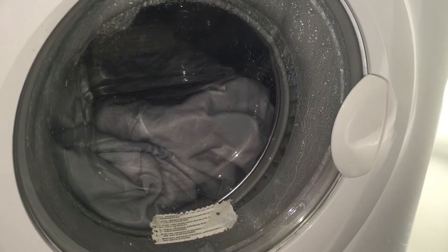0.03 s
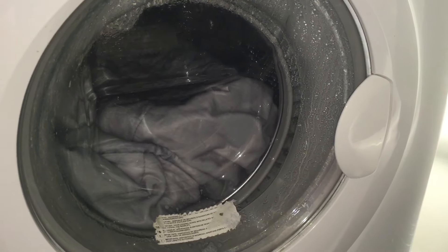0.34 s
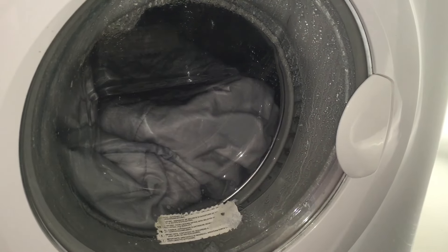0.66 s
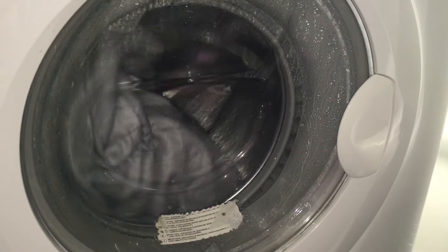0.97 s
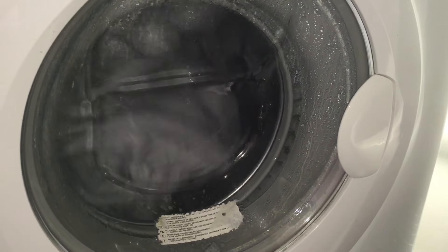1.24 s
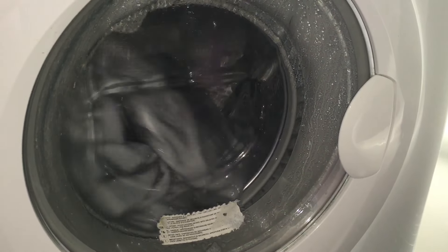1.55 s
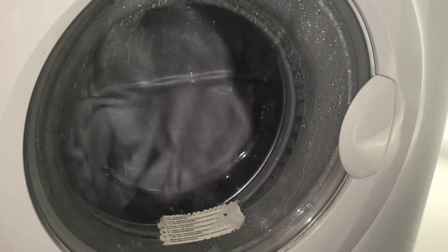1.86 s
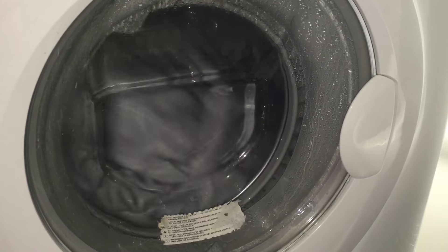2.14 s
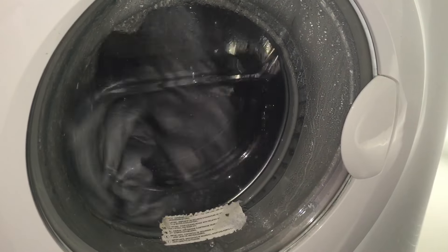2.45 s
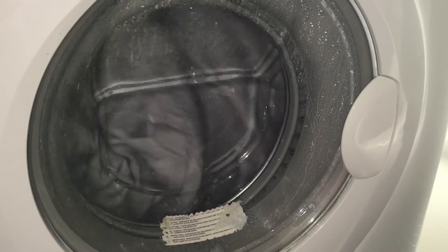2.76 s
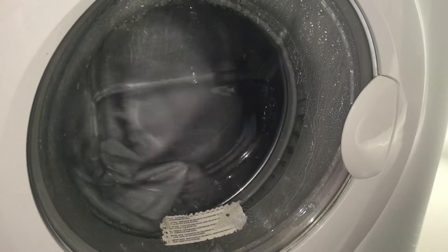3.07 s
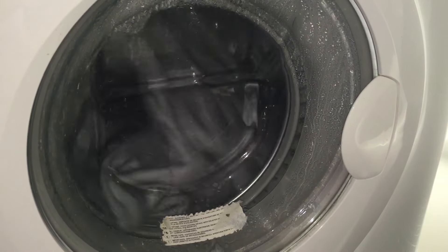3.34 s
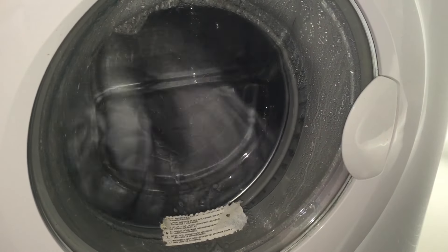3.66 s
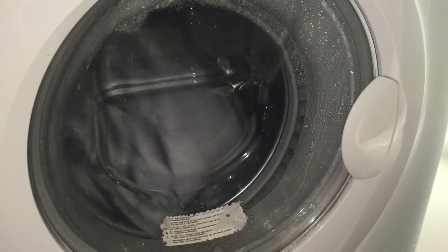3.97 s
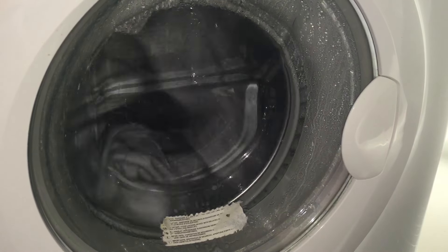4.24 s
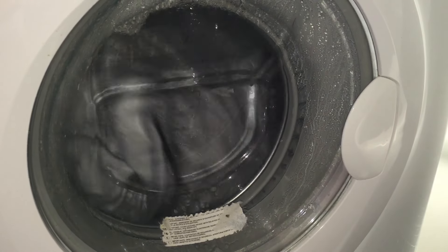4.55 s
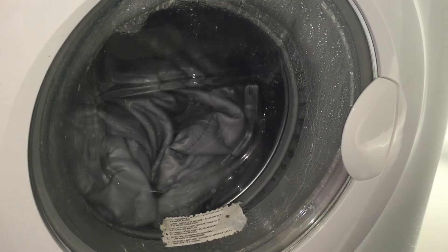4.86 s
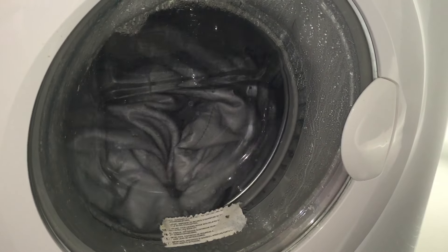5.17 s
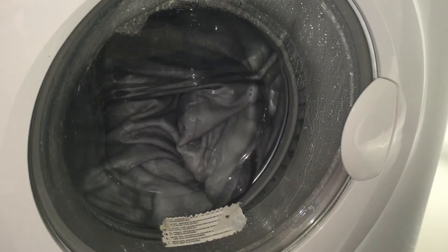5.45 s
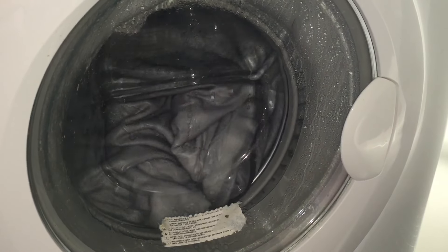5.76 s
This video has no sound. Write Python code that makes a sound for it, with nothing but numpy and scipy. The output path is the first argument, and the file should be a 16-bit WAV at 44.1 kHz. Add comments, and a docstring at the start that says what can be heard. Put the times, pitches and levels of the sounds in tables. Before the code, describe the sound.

A washing machine clicks on, hums and tumbles wet laundry with sloshes, slaps and thuds for about four seconds, then stops.

```python
"""In a small hard room, a front-loading washing machine makes one four-second tumble.
A relay (an electric switch) clacks, and the mains motor hums with a slow throb. Wet laundry
falls in the steel drum: it sloshes, slaps, and thuds against a tub that hangs on springs.
The motor cuts out, the load settles with a last flop, and a faint idle hum remains."""
import sys
import numpy as np
from scipy import signal
from scipy.fft import rfft, irfft, next_fast_len
from scipy.io import wavfile
from scipy.ndimage import uniform_filter1d, map_coordinates

SR = 44100
rng = np.random.default_rng(int(sys.argv[2]) if len(sys.argv) > 2 else 0)


def inscribe(sig):
    """Save sig as 16-bit PCM at rate SR to the path in sys.argv[1].

    A 1-D sig is mono; a 2-D sig holds one channel per row.
    Samples are clipped to [-1, 1] before scaling.
    """
    pcm = np.round(np.clip(np.atleast_2d(sig).T, -1, 1) * 32767)
    wavfile.write(sys.argv[1], SR, pcm.astype(np.int16))


N = 264908

# how long the room takes to fade by 60 dB: (frequency [Hz], fade time [s])
ROOM_FADE = [(100, 0.46), (1000, 0.5), (3500, 0.41), (9000, 0.3), (15000, 0.17)]
# the hum of the waiting machine: (frequency [Hz], level [dB])
IDLE_TONES = [(123.8, -75.5), (200, -79.5), (300.1, -71.5)]
# the motor's magnetic hum; two weaker side tones around each tone make it throb:
# (multiple of the mains [ratio], level [dB], upper side tone [ratio], lower side tone [ratio])
MOTOR_TONES = [(2, -60.5, 0.14, 0.1), (4, -48.5, 0.03, 0.022), (6, -46, 0.64, 0.49), (10, -54, 0.03, 0.052)]

# the tone colour of each noise: (frequency [Hz], relative level [dB])
AIR_COLOUR = [(15, -55), (25, -28), (64, -6.5), (129, -10), (152, -13.5), (189, -11), (268, -15), (299, -6),
              (324, -18), (413, -18.5), (485, -21.5), (951, -18.5), (1030, -23.5), (1590, -23),
              (15700, -37)]  # room air
CLACK_COLOUR = [(200, -3), (600, -0.5), (1200, -4), (1950, 1), (2600, -5), (3900, -5.5), (4400, -23.5),
                (5400, -16), (6800, -16), (7900, -28), (9200, -21), (15500, -27)]  # relay contacts
TICK_COLOUR = [(1200, 1), (2200, -3.5), (3400, 8), (4500, -5), (6000, 1.5), (7800, -12), (9000, -13),
               (13000, -13), (16000, -16)]  # small hard hits
CHURN_COLOUR = [(290, -34), (350, 0.5), (400, -1.5), (445, -13.5), (485, -5), (530, 1.5), (600, -4),
                (720, -1.5), (900, -2.5), (1400, -11), (2000, -26), (3000, -55)]  # water at the bottom of the tub
SLOSH_COLOUR = [(300, -46), (380, -5), (445, -13), (540, -4.5), (700, 0), (900, -7), (1080, 1), (1320, -3),
                (1600, -14), (1900, -3.5), (2500, -82), (5000, -61)]  # water moved by a fall
SPRAY_COLOUR = [(1000, -30), (1600, -1), (1950, -0.5), (2400, -6.5), (2900, -12.5), (3400, -11),
                (4100, -15.5), (4800, -22.5), (5700, -15), (7500, -24), (9000, -18.5), (15500, -52)]  # drops on the door glass
SLAP_COLOUR = [(150, -3.5), (350, 7.5), (450, 1.5), (600, -2.5), (1000, -4.5), (1400, -2.5), (2000, -9),
               (2800, -33), (5000, -41)]  # wet cloth landing
SPLASH_COLOUR = [(1200, -17), (2100, 6), (2900, -4), (3500, -3), (4100, -10), (4700, -18), (5800, -16.5),
                 (8000, -35), (15000, -50)]  # the splash of that landing

# the notes at which each part rings: (frequency [Hz], width [Hz], relative level [dB])
TUB_NOTES = [(41.8, 4.9, -15), (59, 7.5, -1), (74, 8.8, 1), (109.3, 5.4, -3), (125.5, 4.8, -2)]  # the tub on its springs
CABINET_NOTES = [(172.2, 7.3, 4), (195.3, 8.9, -1.5), (226, 12, -6), (269.7, 20, -6.5), (304.7, 14.4, -3.5),
                 (376, 13, -15.5)]  # the outer panels
DRUM_NOTES = [(828, 25, -3), (960, 54, -4), (1288, 74, 1), (1484, 27, -2.5)]  # the steel drum
# the notes of the relay's case: (frequency [Hz], relative level [dB], time to fade 60 dB [s])
CASE_NOTES = [(1500, -7.5, 0.29), (1730, -1.5, 0.15), (1943, 6.5, 0.035), (2184, -12, 0.1),
              (2510, -8, 0.18), (2630, -3, 0.07), (3320, -12, 0.13), (5265, -12, 0.12), (5670, -22, 0.18)]

# a faint relay picks the direction, the main one closes and bounces: (time [s], relative level [dB])
RELAY_HITS = [(0.472, -63.5), (0.7956, -37.5), (0.801, -36.5), (0.812, -41.5)]
# drops and fasteners tick in the drum: (time [s], relative level [dB])
TICK_HITS = [(0.4706, -70), (1.036, -45.5), (1.1503, -54), (1.292, -47.5), (1.378, -50), (1.5798, -56),
             (1.9517, -52), (2.2975, -50.5), (2.552, -53), (2.652, -51), (3.073, -50.5), (3.6703, -54),
             (4.073, -51), (4.422, -47), (4.928, -57)]
# short ringing notes: air pockets glug, and the steel drum rings once near 1300 Hz:
# (time [s], pitch [Hz], level [dB])
SHORT_RINGS = [(1.372, 2090, -48), (1.855, 1960, -42), (2.122, 1914, -42), (2.548, 2040, -47),
               (2.771, 1310, -39), (3.276, 2440, -50), (3.7, 864, -38), (3.854, 1650, -44),
               (4.252, 1070, -38), (4.474, 1810, -42.5)]
# folds of wet laundry fall and slide down the drum:
# (time [s], slide length [s], slosh [dB], spray [dB], drag on the steel [dB], tub rumble [dB])
LAUNDRY_FALLS = [(0.83, 0.25, -55.5, -57, -63, -55), (1.135, 0.072, -55, -57, -63, -51),
                 (1.37, 0.22, -52, -54.5, -56.5, -45), (1.62, 0.16, -58, -59, -65, -46.5),
                 (1.795, 0.14, -53, -58, -59, -53.5), (2.07, 0.12, -53.5, -58.5, -64, -39.5),
                 (2.24, 0.047, -56.5, -61.5, -62, -44), (2.55, 0.17, -54, -64, -62, -50.5),
                 (2.738, 0.033, -55, -57, -50, -76), (2.86, 0.084, -53, -60.5, -76, -49),
                 (3.17, 0.19, -56.5, -57.5, -68, -49), (3.41, 0.25, -58.5, -63, -66.5, -50),
                 (3.648, 0.095, -51, -60.5, -68, -54), (3.86, 0.12, -54, -60.5, -57, -42.5),
                 (4.015, 0.047, -53, -60.5, -69, -52), (4.25, 0.3, -59.5, -60, -59.5, -46.5),
                 (4.553, 0.018, -55, -65, -48, -63), (4.718, 0.026, -53.5, -78, -52, -42),
                 (4.93, 0.043, -60.5, -69, -65, -54)]
# the load or the drive jolts the drum: (time [s], tub level [dB], cabinet level [dB])
JOLTS = [(0.46, -52, -58), (0.817, -40.5, -43), (0.863, -49, -31), (0.98, -41, -31), (1.025, -33, -27),
         (1.369, -42, -33), (1.529, -32.5, -35), (2.063, -34, -52), (2.134, -46, -31.5), (2.358, -37, -52),
         (2.469, -36, -55), (2.93, -35.5, -34), (3.01, -41, -46), (3.161, -35.5, -56), (3.521, -53, -31.5),
         (3.684, -37, -39), (3.864, -29.5, -44), (3.921, -33, -35), (4.33, -40.5, -36), (4.399, -52, -30),
         (4.555, -38, -35.5), (4.728, -39, -35), (5.17, -60, -55.5)]
# wet cloth slaps the drum and the door glass:
# (time [s], relative level [dB], splash offset [dB], centre of the smack's tone [Hz])
CLOTH_HITS = [(0.991, -36.5, -19, 853), (1.143, -39.5, -12, 1940), (1.376, -31.5, -7.5, 1310),
              (1.498, -31, -20, 600), (1.795, -35, -19, 1710), (1.92, -38, -35, 855),
              (2.094, -39.5, -35, 1170), (2.153, -40, -17, 1700), (2.242, -39.5, -10, 1500),
              (2.551, -36, -15.5, 1630), (2.589, -35.5, -30, 776), (2.752, -37, -15, 1190),
              (2.775, -33, -23, 1320), (2.819, -39, -30, 974), (2.904, -34.5, -24, 810),
              (2.952, -40, -29, 1450), (3.169, -35.5, -29, 1510), (3.648, -35.5, -21, 842),
              (3.691, -34, -33, 859), (3.856, -33.5, -17.5, 1500), (3.879, -46, -27, 1270),
              (4.024, -36, -16.5, 786.4), (4.254, -40, -13, 1070), (4.396, -37, -29, 799),
              (4.555, -34.5, -22, 1460), (4.579, -38, -23, 1300), (4.715, -38, -37, 1250),
              (4.931, -40.5, -14, 799)]

START_S, CUT_S, REST_S = 0.797, 4.46, 4.78  # motor on, motor off, load starts to settle
MAINS_HZ, TOP_HZ = 50.02, 15780
THROB_HZ, THROB_CREST_S = 5.65, 3.182  # the throb's rate and the time of one crest
THROB_START_SHARE, THROB_BUILD_S = 0.27, 2  # its depth at the start, time to full depth
SOFT_START_DB, RUN_UP_S, MOTOR_FADE_DB_PER_S = -21, 0.3, 135
ROLL_UP_S, SETTLE_DB_PER_S = 0.084, 114
# steady levels while the drum turns
ROLL_TUB_DB, ROLL_CABINET_DB = -50.5, -48.5
ROLL_CHURN_DB, ROLL_SPRAY_DB, ROLL_DRAG_DB = -55, -63.5, -64.5
FALL_ATTACK_S, SLIDE_SAG_DB_PER_S = 0.014, 7.5
WATER_DRAIN_DB_PER_S, DRAG_FADE_DB_PER_S, TUB_FADE_DB_PER_S = 103, 113, 77
FALL_BOOM_DB, FALL_CHURN_DB = 6, 0.5  # compared with the same fall's slosh


def amp(db):
    """Turn decibels into a gain, the number to multiply a sound by."""
    return 10 ** (np.asarray(db) / 20)


def unit(x):
    """Scale x to an average (rms) level of 1."""
    return x / np.sqrt(np.mean(x ** 2) + 1e-20)


def along(points, hz):
    """Read between (frequency, value) points, with octaves evenly spaced."""
    point_hz, values = np.transpose(points)
    return np.interp(np.log(hz + 1), np.log(point_hz + 1), values)


def wobble(rate):
    """A smooth random curve through rate points a second."""
    points = rng.standard_normal(int(N * rate / SR) + 4)
    return map_coordinates(points, [np.arange(N) * rate / SR])


def filtered(x, response):
    """Scale each frequency in x by response(frequency)."""
    size = next_fast_len(len(x) + SR // 4)
    return irfft(rfft(x, size) * response(np.fft.rfftfreq(size, 1 / SR)), size)[:len(x)]


def coloured(x, colour):
    """Give x a tone colour and an average level of 1."""
    return unit(filtered(x, lambda hz: amp(along(colour, hz))))


def resonate(x, notes):
    """Let x shake a body, which rings at its own notes and gives off little far from them."""
    def body(hz):
        return sum((-1) ** k * amp(db) * 1j * hz * width / (note ** 2 - hz ** 2 + 1j * hz * width)
                   for k, (note, width, db) in enumerate(notes))
    band = signal.butter(3, [notes[0][0], 1.41 * notes[-1][0]], "band", fs=SR, output="sos")
    return signal.sosfilt(band, filtered(x, body))


def steady(x, span_s):
    """Even out the level of x over span_s seconds."""
    return x / np.sqrt(np.abs(uniform_filter1d(x ** 2, int(span_s * SR))) + 1e-12)


def add(track, s, sound):
    """Mix a sound into the track at s seconds."""
    part = track[round(s * SR):][:len(sound)]
    part += sound[:len(part)]


def room_echo(x):
    """The room's answer to x: a wash of reflections whose treble dies first."""
    hz, t, noise = signal.stft(rng.standard_normal(SR // 2), SR, nperseg=256)
    fade = amp(-60 * t / along(ROOM_FADE, hz)[:, None])
    tail = signal.istft(noise * fade, SR, nperseg=256)[1]
    return signal.fftconvolve(x, tail / np.linalg.norm(tail))[:len(x)]


def burst(colour, attack_s, fade_s, room_db):
    """The noise of one hit, falling 60 dB in fade_s, plus its echo; the level starts near 1."""
    t = np.arange(SR // 2) / SR
    shape = (1 - np.exp(-t / attack_s)) * amp(-60 * t / fade_s)
    direct = coloured(rng.standard_normal(len(t)), colour) * shape
    heard = direct + amp(room_db) * room_echo(direct)
    return heard / np.std(heard[:SR // 50])


def bubbles(count, centre_hz, cycles, spread_db):
    """Bubbles squeezed from wet cloth: tiny fading tones that rise in pitch, heard in the room."""
    when, pitch, size = rng.random(count), rng.standard_normal(count), rng.exponential(size=count)
    hz = np.clip(centre_hz * np.exp(.5 * pitch), 300, 12000)[:, None]
    t = np.arange(SR // 60) / SR
    age = t * hz / cycles
    strength = amp(spread_db * np.minimum(size, 4))[:, None]
    rise = 1 + 0.08 * np.minimum(age, 2)
    pops = strength * np.exp(-3 * age) * np.sin(2 * np.pi * hz * t * rise)
    positions = (when * N).astype(int)[:, None] + np.arange(len(t))
    direct = np.bincount(positions.ravel(), pops.ravel(), N)[:N]  # add all pops into one track
    return unit(direct + amp(-0.5) * room_echo(direct))


def rolling():
    """The load's gain: it gets going with the motor and rolls on a little after the cut."""
    t = np.arange(N) / SR
    return np.clip((t - START_S) / ROLL_UP_S, 0, 1) * amp(-SETTLE_DB_PER_S * np.maximum(t - REST_S, 0))


def surges(levels_db, fade_db_per_s):
    """The gain of all falls: each swells quickly, sags while the fold slides, then dies away."""
    age, power = np.arange(SR) / SR, np.zeros(N)
    for (s, slide_s, *_), db in zip(LAUNDRY_FALLS, levels_db):
        swell = np.minimum(age / FALL_ATTACK_S, 1)
        sag_db = SLIDE_SAG_DB_PER_S * (age - slide_s / 2)
        fade_db = fade_db_per_s * np.maximum(age - slide_s, 0)
        add(power, s, (swell * amp(db - sag_db - fade_db)) ** 2)
    return np.sqrt(power)


def standby():
    """Quiet room air and the faint hum of the powered machine."""
    t, hum = np.arange(N) / SR, np.zeros(N)
    for hz, db in IDLE_TONES:
        hum += np.sqrt(2) * amp(db + wobble(16)) * np.sin(2 * np.pi * hz * t + 0.36 * wobble(3.2))
    return hum + amp(-66.5) * coloured(rng.standard_normal(N), AIR_COLOUR)


def relays():
    """The switch contacts clack and make their case ring."""
    out, t = np.zeros(N), np.arange(SR // 2) / SR
    for s, db in RELAY_HITS:
        ring = sum(amp(level - 60 * t / fade_s) * np.sin(2 * np.pi * (hz * t + rng.random()))
                   for hz, level, fade_s in CASE_NOTES)
        clack = burst(CLACK_COLOUR, attack_s=0.00067, fade_s=0.066, room_db=0.5)
        add(out, s, amp(db - 8.5) * (clack + amp(-2.5) * ring))
    return out


def motor():
    """The spinning part lags the magnetic field, so the hum throbs, more deeply once up to speed."""
    t, hum = np.arange(N) / SR, np.zeros(N)
    depth = np.interp(t - START_S, [0, THROB_BUILD_S], [THROB_START_SHARE, 1])
    slip = np.exp(2j * np.pi * THROB_HZ * (t - THROB_CREST_S))
    for multiple, db, upper, lower in MOTOR_TONES:
        phase = 2 * np.pi * (multiple * MAINS_HZ * t + rng.random()) + 0.074 * wobble(8.1)
        throb = 1 + depth * (upper * slip + lower / slip)
        strength = np.sqrt(2) * amp(db + 1.1 * wobble(5.55) + 1.12 * wobble(29.94))
        hum += strength * np.real(throb * np.exp(1j * phase))
    run_up = np.clip((t - START_S) / RUN_UP_S, 0, 1)
    fade_db = MOTOR_FADE_DB_PER_S * np.maximum(t - CUT_S, 0)
    return (t > START_S) * amp(SOFT_START_DB * (1 - run_up) - fade_db) * hum


def ticks():
    """Drops and fasteners tap the drum."""
    out = np.zeros(N)
    for s, db in TICK_HITS:
        add(out, s - .001, amp(db - 15) * burst(TICK_COLOUR, attack_s=0.0022, fade_s=0.03, room_db=4.5))
    return out


def short_rings():
    """Air pockets glug, and the steel drum rings once; each brief note rises a little in pitch."""
    out, t = np.zeros(N), np.arange(SR // 4) / SR
    shape = (1 - np.exp(-t / 0.0041)) * amp(-60 * t / 0.074)
    for s, hz, db in SHORT_RINGS:
        ring = shape * np.sin(2 * np.pi * hz * t * (1 + 0.29 * t))
        add(out, s, amp(db) * (ring + amp(-6.5) * room_echo(ring)))
    return out


def dragging(roll, drag_db):
    """Cloth sliding over the steel gives the drum a hollow ring."""
    rubbing = np.hypot(amp(ROLL_DRAG_DB) * roll, surges(drag_db, DRAG_FADE_DB_PER_S))  # powers add
    return rubbing * steady(resonate(rng.standard_normal(N), DRUM_NOTES), 0.14)


def spray(roll, spray_db):
    """Drops patter on the door glass, louder with each fall."""
    spraying = np.hypot(amp(ROLL_SPRAY_DB) * roll, surges(spray_db, WATER_DRAIN_DB_PER_S))
    flicker = amp(0.54 * wobble(27.88))
    drops = bubbles(count=3000, centre_hz=2814, cycles=19.7, spread_db=3) + 0.6 * rng.standard_normal(N)
    patter = amp(-27.5) * bubbles(count=260, centre_hz=7860, cycles=3.9, spread_db=1)
    return spraying * flicker * (steady(coloured(drops, SPRAY_COLOUR), 0.17) + patter)


def water(roll, sloshing):
    """The rolling load churns the pool in the tub; each fall stirs it more and adds a slosh."""
    churning = np.hypot(amp(ROLL_CHURN_DB) * roll, amp(FALL_CHURN_DB) * sloshing)
    pool = bubbles(count=1500, centre_hz=596, cycles=10.6, spread_db=2.5) + 0.5 * rng.standard_normal(N)
    wave = bubbles(count=2200, centre_hz=1012, cycles=15.5, spread_db=4) + 0.27 * rng.standard_normal(N)
    churn = churning * steady(coloured(pool, CHURN_COLOUR), 0.19)
    slosh = sloshing * steady(coloured(wave, SLOSH_COLOUR), 0.21)
    return churn + slosh


def rumble(roll, sloshing, tub_db):
    """The rolling load shakes the tub and the cabinet, harder with each fall."""
    shaking = np.hypot(amp(ROLL_TUB_DB) * roll, surges(tub_db, TUB_FADE_DB_PER_S))
    booming = np.hypot(amp(ROLL_CABINET_DB), amp(FALL_BOOM_DB) * sloshing) * roll
    tub = shaking * steady(resonate(rng.standard_normal(N), TUB_NOTES), 0.14)
    cabinet = booming * steady(resonate(rng.standard_normal(N), CABINET_NOTES), 0.11)
    return tub + cabinet


def thuds():
    """Each jolt is a soft, ragged push that rings the tub and the cabinet."""
    out, t = np.zeros(N), np.arange(SR // 2) / SR
    for s, tub_db, cabinet_db in JOLTS:
        for notes, db in (TUB_NOTES, tub_db), (CABINET_NOTES, cabinet_db):
            push = rng.standard_normal(len(t)) * amp(-60 * t / 0.1)
            ring = resonate(push, notes)
            add(out, s, amp(db + 0.5) * ring / np.abs(ring).max())
    return out


def slaps():
    """Wet cloth lands with a smack, each pitched around its own tone centre, and a brighter splash."""
    out = np.zeros(N)
    for s, db, splash_db, centre_hz in CLOTH_HITS:
        fold_colour = [(hz, level - 3 * abs(np.log2(hz / centre_hz))) for hz, level in SLAP_COLOUR]
        smack = burst(fold_colour, attack_s=0.0043, fade_s=0.033, room_db=0)
        splash = burst(SPLASH_COLOUR, attack_s=0.0019, fade_s=0.082, room_db=-0.5)
        add(out, s - .002, amp(db - 13) * smack + amp(db + splash_db - 8.5) * splash)
    return out


def scene():
    """All parts of the machine, heard from just in front of the door."""
    _, _, slosh_db, spray_db, drag_db, tub_db = np.transpose(LAUNDRY_FALLS)
    roll, sloshing = rolling(), surges(slosh_db, WATER_DRAIN_DB_PER_S)
    machine = standby() + relays() + motor()
    details = ticks() + short_rings() + dragging(roll, drag_db) + spray(roll, spray_db)
    tumble = water(roll, sloshing) + rumble(roll, sloshing, tub_db) + thuds() + slaps()
    return (machine + details + tumble)[None]


def record(dry):
    """The microphone keeps nothing above TOP_HZ."""
    return np.array([filtered(channel, lambda hz: hz < TOP_HZ) for channel in dry])


dry = scene()
out = record(dry)
inscribe(out)
```